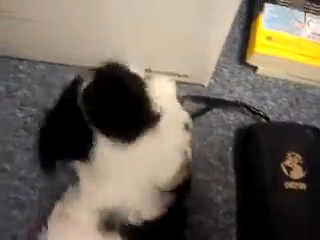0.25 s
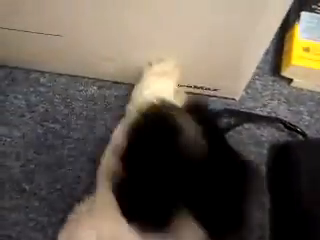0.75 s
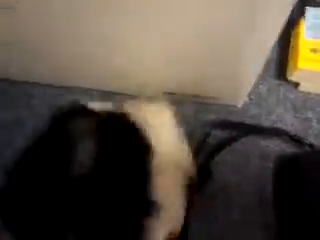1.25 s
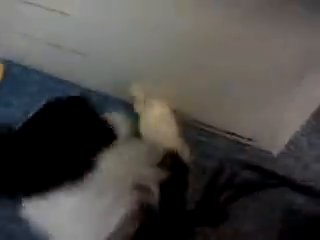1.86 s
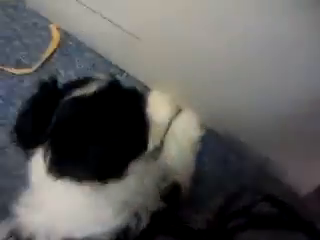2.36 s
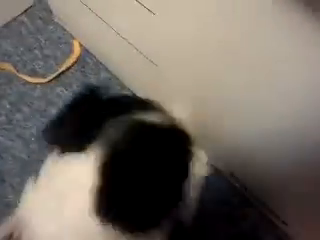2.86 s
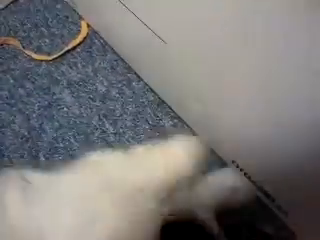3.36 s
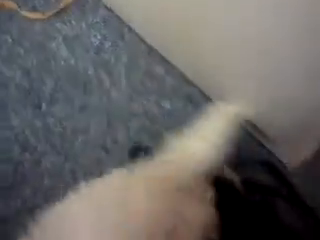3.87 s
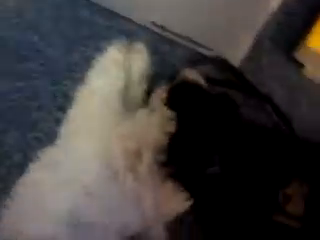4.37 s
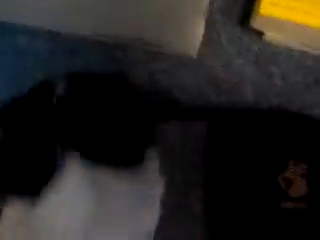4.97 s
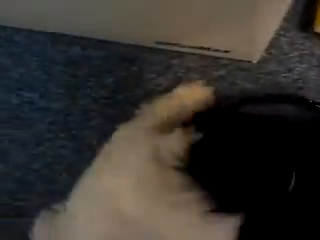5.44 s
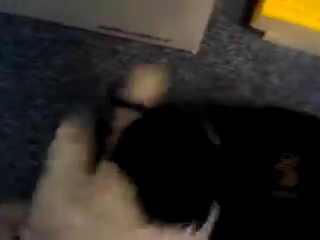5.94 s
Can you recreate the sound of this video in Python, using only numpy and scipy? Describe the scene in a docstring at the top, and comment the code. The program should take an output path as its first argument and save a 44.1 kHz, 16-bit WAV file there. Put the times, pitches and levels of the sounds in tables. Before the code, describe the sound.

Close up in a small carpeted room, a little dog digs at a cardboard box. Paws slap the hollow panel about five times a second, each slap followed by a dry rising rasp of claws and sometimes a soft thump. It stops; the box ticks and creaks. A shorter flurry follows, then a faint wheeze, light rustling and quiet room hum. The phone microphone sounds slightly dull on top.

```python
"""A puppy digs at a cardboard box on a carpet: each paw slaps the panel, exciting its resonant modes,
then the claws rake down the card in stick-slip, with short ticks and soft thumps as the box rocks.
The box creaks in runs of even slips, fur rubs as filtered jolts, and a faint wheeze flutters as a tone.
A small room answers with decaying noise and hums as shaped noise; a phone microphone dulls the treble."""
import sys
import numpy as np
from scipy import signal
from scipy.fft import rfft, irfft, next_fast_len
from scipy.io import wavfile
from scipy.ndimage import map_coordinates

SR = 44100
rng = np.random.default_rng(int(sys.argv[2]) if len(sys.argv) > 2 else 0)


def magnitude_from_level(level_db):
    """Linear magnitude for a level in decibels (20 dB per decade)."""
    exponent = np.asarray(level_db, float) / 20
    return 10 ** exponent


def output_pcm(signal):
    """Save a mono or channel-first signal as 16-bit PCM at the path in sys.argv[1].

    Samples are clipped to [-1, 1] before scaling.
    """
    pcm = np.clip(np.atleast_2d(signal).T, -1, 1) * 32767
    wavfile.write(sys.argv[1], SR, np.round(pcm).astype(np.int16))


N = 273787
TIME = np.arange(N) / SR  # seconds

# Paw landings. Each row: start in seconds, then levels in dB, before trims common to all rows,
# of the peak, the low panel modes, the high panel modes and the claw skid.
SLAPS = [(0.004, -18, -13.5, -13, -34.5), (0.236, -17.5, -4, -11.5, -31), (0.434, -20, -11.5, -13, -38.5),
         (0.602, -14.5, -33, -25, -58), (0.642, -28.5, -3, -27, -41.5), (0.81, -21.5, -16.5, -15.5, -40),
         (0.842, -26.5, -10.5, -20, -60), (1.039, -19, -6.5, -4, -32), (1.259, -19.5, -9.5, -12.5, -41),
         (1.283, -30, -14, -26, -69), (1.478, -12, -15, -12.5, -25.5), (1.71, -13, -6, -8.5, -31.5),
         (1.948, -19, -16, -5.5, -41), (2.1, -31.5, -2, 6, -33), (2.171, -19.5, -27, -11.5, -33),
         (3.027, -22, -9.5, -4, -27), (3.254, -18, -11, -11.5, -24), (3.478, -33.5, -19, -6, -43),
         (3.619, -12.5, -2, 4, -29), (3.734, -21, -26, -15, -44), (3.811, -21, -24, -10, -28.5),
         (3.872, -41, -24, -9, -47.5), (3.956, -32.5, -41, -11, -30.5)]
# Modes of the box panel. Each row: frequency in Hz, width in Hz, level in dB.
PANEL = [(82, 34, -11.5), (247, 97, -2), (400.5, 102, 0.5), (699, 217, 0.5), (985, 210, -0.5),
         (1323, 284, -2.5), (1866, 323, -5.5), (2920, 490, -12), (6080, 640, -18.5)]
# Resonances of a claw on card fibres. Each row: frequency in Hz, width in Hz, level in dB.
FIBRES = [(1390, 660, -16), (3270, 960, -3), (4440, 1700, -5.5), (5580, 1120, -1.5), (6930, 1130, -1),
          (7313, 1520, -7)]


def unit(x):
    """Normalisation to a root-mean-square of 1."""
    return x / np.sqrt(np.mean(x ** 2) + 1e-20)


def along(points, hz):
    """Interpolation of (Hz, value) points on a logarithmic frequency axis."""
    f, v = np.transpose(points)
    return np.interp(np.log(hz + 1), np.log(f + 1), v)


def curves(rows):
    """Linear interpolation in time: one value per sample for each column after the time."""
    s, *cols = np.transpose(rows)
    return [np.interp(TIME, s, c) for c in cols]


def wobble(rate):
    """Smooth random modulation: a spline through random knots, rate of them a second (400 at most)."""
    knots = rng.standard_normal(int(N / SR * 400) + 4)
    return map_coordinates(knots, [TIME * min(rate, 400)])


def filtered(x, response):
    """Linear filtering: the spectrum of x times a response given over frequency."""
    m = next_fast_len(len(x) + 8192)
    return irfft(rfft(x, m) * response(np.fft.rfftfreq(m, 1 / SR)), m)[:len(x)]


def ringing(modes):
    """Modal superposition: causal second-order resonances summed with alternating sign."""
    def response(f):
        total = 0
        for k, (centre, width, db) in enumerate(modes):
            damping = 1j * f * width
            total = total + (-1) ** k * magnitude_from_level(db) * damping / (centre * centre - f * f + damping)
        return total
    return response


def catches(share, spread_db):
    """Stick-slip force: a share of samples carry a jolt of widely varying size."""
    jolt = rng.standard_normal(N) * magnitude_from_level(spread_db * rng.exponential(size=N))
    return unit(jolt * (rng.random(N) < share))


def gritty(modes, share, spread_db, flicker_db):
    """Stick-slip excitation of modes whose strengths flicker as the contact point moves."""
    force = catches(share, spread_db)
    total = np.zeros(N)
    for k, mode in enumerate(modes):
        strength = magnitude_from_level(flicker_db * wobble(70))
        total += (-1) ** k * strength * filtered(force, ringing([mode]))
    return unit(total)


def add(track, s, sound):
    """Superposition: mixes a sound into the track at time s."""
    room = track[round(s * SR):][:len(sound)]
    room += sound[:len(room)]


def damped_click(track, s, db, hz):
    """Free decay: a damped sine rings on a dull burst of resonant noise."""
    t = TIME[:1024]
    ring = np.sin(2 * np.pi * hz * t) * magnitude_from_level(-60 * t * hz / 16)  # falls 60 dB in sixteen cycles
    burst = 1.12 * rng.standard_normal(len(t)) * magnitude_from_level(-60 * t / 0.053)
    click = filtered(burst, ringing([(2500, 2400, 0)]))
    add(track, s, magnitude_from_level(db - 9.0) * (ring + click))


def room_tone():
    """Stationary noise: a fixed spectral shape gives hum and hiss, its level drifting slightly."""
    # Spectrum of the quiet room. Each row: frequency in Hz, relative density in dB per Hz.
    tone_spectrum = [(15, -57.5), (25, -31), (80, -23.5), (107, -10), (176, 1.5), (214, -7.5), (268, -8),
                     (369, -11), (428, -9), (1590, -21.5), (2030, -19.5), (2940, -25), (6640, -25.5),
                     (8100, -23.5), (9160, -47), (11900, -96), (20200, -120)]
    hum = filtered(rng.standard_normal(N), lambda f: magnitude_from_level(along(tone_spectrum, f)))
    return magnitude_from_level(-56 + 0.63 * wobble(6.4)) * unit(hum)


def drag():
    """Sliding friction: clumpy rubbing, bright on carpet, dull on panel; the dog's weight thuds under it."""
    # Fur and pads dragging. Each row: time in seconds, level on the carpet in dB,
    # level on the panel in dB, both before a fixed trim.
    drag_levels = [(0.0, -56.5, -50.5), (0.34, -58.5, -62.5), (0.5, -49.5, -46.5), (0.71, -54.5, -49),
                   (0.86, -60, -63), (1.14, -55, -49), (1.3, -58, -51), (1.64, -52.5, -51.5),
                   (2.16, -54, -45), (2.4, -58, -55), (2.66, -56.5, -51), (2.85, -61.5, -58.5),
                   (3.45, -54, -54), (3.6, -63, -64), (4.0, -59, -63), (4.25, -54.5, -51.5),
                   (4.44, -62, -61), (5.6, -66, -61), (6.2, -57.5, -58)]
    rustle_db, panel_db = curves(drag_levels)
    weight_db = -74 + 0.9 * (panel_db + 56)  # follows the rubbing on the panel
    rustle = unit(filtered(catches(share=.3, spread_db=2.0), ringing(FIBRES)))
    panel = unit(filtered(catches(share=0.05, spread_db=2.0), ringing(PANEL[1:7])))
    thuds = unit(filtered(rng.standard_normal(N), ringing(PANEL[:1])))
    rustle = magnitude_from_level(rustle_db - 3.5 + 1.7 * wobble(31)) * rustle
    panel = magnitude_from_level(panel_db - 6.5 + 2.4 * wobble(30)) * panel
    return rustle + panel + magnitude_from_level(weight_db + 4.3 * wobble(14)) * thuds


def slaps():
    """Impact excitation: pad and four claws strike in quick turn, stirring modes by spot; the claws skid."""
    out, skid, t = np.zeros(N), np.zeros(N), TIME[:4096]
    for s, db, low_db, high_db, skid_db in SLAPS:
        luck = rng.random((3, len(PANEL)))
        # seconds over which the claws land: a hard blow lands them closer together
        spread = np.clip(.008 - .0012 * (db + 12), .004, .017)
        force = np.zeros(len(t))
        when = np.r_[0, luck[0, :4] * spread]
        claws = (.85 - .65 * luck[0, :4]) * np.sign(luck[0, 4:8] - .3)  # later claws land softer
        force[(when * SR).astype(int)] = np.r_[1, claws]
        force += 0.13 * rng.standard_normal(len(t)) * magnitude_from_level(-60 * t / (3.08 * spread))  # the pad rolls flat
        # mode gain at the landing spot: (Hz, dB)
        spot = [(80, -11.0), (300, low_db + 9.5), (400, low_db + 11), (850, -0.5), (1600, high_db + 8)]
        modes = []
        for (hz, width, level), a, b in zip(PANEL, luck[1], luck[2]):
            modes.append((hz * (0.931 + 0.095 * a), width, level + along(spot, hz) + 4 * b))
        knock = filtered(force, ringing(modes))
        add(out, s, magnitude_from_level(db + 0.5) * knock / abs(knock).max())
        # the skid falls 20 dB in 5 ms once the claws are down
        add(skid, s, magnitude_from_level(skid_db - 6.5 - 20 * np.maximum(t - spread, 0) / 0.005))
    return out + skid * gritty(FIBRES, share=.25, spread_db=2.1, flicker_db=1.5)


def walls(x):
    """Reverberation: noise tails, redrawn every tenth of a second, decay at a rate set by frequency."""
    # Decay of the room. Each row: frequency in Hz, time to fall 60 dB in seconds.
    decay_times = [(200, .25), (1000, .2), (7000, 0.14)]
    out, step = np.zeros(N), SR // 10
    for start in range(0, N, step):
        hz, t, z = signal.stft(rng.standard_normal(SR // 4), SR, nperseg=256)
        decay = magnitude_from_level(-60 * t / along(decay_times, hz)[:, None])
        tail = signal.istft(z * decay, SR, nperseg=256)[1]
        answer = signal.fftconvolve(x[start:start + step], tail / np.linalg.norm(tail))
        add(out, start / SR + .004, answer)
    return out


def strokes():
    """Stick-slip friction: claws speed up down the card, hold, let go; panel rumble leads the rasp."""
    # Claw strokes. Each row: release in seconds, rasp level in dB, panel rumble level in dB,
    # rasp rise time per 20 dB in ms, hold before release in ms (both times kept within 1 to 90).
    stroke_rows = [(0.109, -24, -36.5, 22.5, 0.88), (0.335, -29.5, -37, 16.5, 25.3),
                   (0.557, -31.5, -36, 25, 21.6), (0.659, -42.5, -54, 7, 10),
                   (0.709, -27.5, -36.2, 23.5, 3.5), (0.751, -53.5, -51, 34, 12),
                   (0.936, -32, -35, 14.5, 20), (1.17, -28.5, -34, 34, 34), (1.386, -31, -33.5, 7.5, 18.4),
                   (1.589, -26, -34.5, 20.5, 17), (1.81, -21, -31.5, 24.5, 0.87),
                   (1.967, -37.5, -37, 28, 7), (2.043, -28, -34.5, 9.5, 17.5), (2.29, -34, -41.5, 26.5, 15),
                   (2.361, -45, -47, 39, 1.1), (3.127, -22.5, -37.5, 27.5, 0.81),
                   (3.381, -22.5, -32.5, 35.5, 4.7), (3.561, -35, -50.5, 37, 4.3),
                   (3.588, -34, -47, 27, 5.3), (3.74, -37, -40, 28, 6.5), (3.838, -28.5, -38.5, 62, 6.9),
                   (4.0, -43.5, -60, 80, 27), (4.027, -31.5, -42.5, 26, 1), (4.776, -52.5, -58, 11, 26),
                   (5.915, -56.5, -62, 28, 9.4)]
    # Treble of the rasp. Each row: time in seconds, gain in dB well above the knee.
    treble_gain = [(0, 0.5), (0.7, 0), (1.3, -0.5), (1.6, 1.8), (2.04, 3.5), (2.4, -4.5), (3.1, 2.5),
                   (3.6, -1.5), (4.1, 1.5), (6.2, 3)]
    treble_knee_hz, landing_lead_s, let_go_ms = 5070, .012, 9  # let go: ms to fall 20 dB
    rasp, rumble = np.zeros((2, N))
    landings = np.array([row[0] for row in SLAPS])
    for s, db, rumble_db, *ms in stroke_rows:
        rise, hold, fall = np.clip([*ms, let_go_ms], 1, 90) / 1000
        before, after = np.maximum(s - hold - TIME, 0), np.maximum(TIME - s, 0)
        # nothing rasps before the paw is on the box
        down = TIME > landings[landings < s - landing_lead_s].max()
        snap_db = 4 * np.exp(-((TIME - s + 0.0057) / 0.0016) ** 2)  # the tips spring free
        rasp += down * magnitude_from_level(db + snap_db - 20 * before / rise - 20 * after / fall)
        rasp += (TIME > s) * magnitude_from_level(db - 31.5 - 20 * after / 0.1)  # the pads slide off onto the carpet
        rumble += down * magnitude_from_level(rumble_db - 20 * before / (2.41 * rise) - 20 * after / (1.4 * fall))
    ribs = magnitude_from_level(1.36 * wobble(220))  # the corrugation makes the grip uneven
    fibres = unit(ribs * gritty(FIBRES, share=.25, spread_db=1.1, flicker_db=2.5))
    panel = unit(ribs * gritty(PANEL[1:7], share=.05, spread_db=1.5, flicker_db=2.0))
    treble = filtered(fibres, lambda f: 1 / (1 + (treble_knee_hz / (f + 1)) ** 8))
    fibres = fibres + (magnitude_from_level(curves(treble_gain)[0]) - 1) * treble
    return rasp * fibres + rumble * panel


def thumps():
    """Impulsive loading: each rock of the box under a hard pull is one soft push on a low, broad mode."""
    # Rocks of the box on the carpet. Each row: time in seconds, level of the push in dB.
    rocks = [(.108, -51), (.33, -41.5), (.556, -45), (0.705, -50), (1.165, -38), (1.379, -56), (1.586, -38),
             (1.807, -38.5), (2.041, -38), (2.104, -35.5), (2.298, -54), (3.125, -43), (3.38, -43)]
    push = sum(magnitude_from_level(db) * np.exp(-((TIME - s) / 0.0019) ** 2) for s, db in rocks)
    return filtered(push, ringing([(45, 210, 0.015)]))


def ticks():
    """Free vibration: claw tips, and the louder slips of the creaking box, each ring at their own pitch."""
    # Short clicks: claw tips, and the louder slips of the creaking box.
    # Each row: start in seconds, level in dB before a fixed trim, pitch in Hz.
    tick_rows = [(0.191, -35, 1580), (0.396, -28.5, 2220), (0.496, -38, 929), (0.954, -32, 3530),
                 (0.998, -33.5, 2800), (2.138, -25.5, 2750), (2.439, -30, 1610), (2.7, -28, 1270),
                 (2.931, -29, 3280), (3.419, -20.5, 2160), (4.764, -33, 1450), (5.278, -37, 1000),
                 (5.82, -42, 1890), (5.865, -39, 1900), (5.955, -41.5, 825), (6.003, -42, 1660)]
    out = np.zeros(N)
    for s, db, hz in tick_rows:
        damped_click(out, s, db, hz)
    return out


def creaks():
    """Periodic stick-slip: the settling box gives way in runs of evenly spaced slips."""
    # Runs of slips. Each row: first slip in seconds, spacing in seconds, number of slips,
    # mean level in dB before a fixed trim.
    creak_runs = [(2.4655, .0285, 8, -37), (2.743, .0445, 3, -36.5)]
    out = np.zeros(N)
    for s, gap, count, db in creak_runs:
        for k in range(count):
            slip_db = db + 4.5 * rng.standard_normal()
            slip_hz = 900 * (1 + 0.026 * rng.standard_normal())
            damped_click(out, s + k * gap, slip_db, slip_hz)
    return out


def wheeze():
    """Amplitude modulation: random flutter blurs a gliding sine that fades in and out."""
    # A faint narrow wheeze. Each row: time in seconds, frequency in Hz, level in dB.
    wheeze_line = [(3.84, 1150, -52), (4.08, 1160, -62), (4.2, 1200, -60), (4.33, 1160, -59),
                   (4.44, 1206, -67), (4.48, 1090, -64), (4.55, 1060, -69), (4.6, 1060, -75)]
    hz, db = curves(wheeze_line)
    from_ends = np.minimum(TIME - wheeze_line[0][0], wheeze_line[-1][0] - TIME)
    sounding = np.clip(from_ends / 0.036, 0, 1)  # 36 ms fades
    flutter = unit(wobble(160)) * magnitude_from_level(1.5 * wobble(30))
    tone = np.sqrt(2) * np.sin(2 * np.pi * np.cumsum(hz) / SR)
    return sounding * magnitude_from_level(db) * flutter * tone


def scene():
    """Superposition of direct sound and reverberation: the dog at the box, in the room."""
    near = slaps() + strokes() + thumps() + ticks() + creaks() + drag()
    return (near + magnitude_from_level(-14.5) * walls(near) + wheeze() + room_tone())[None]


def low_pass(x):
    """Removes everything above the highest recorded frequency."""
    return signal.sosfilt(signal.butter(12, 9310, fs=SR, output="sos"), x)


def record(dry):
    """Low-pass filtering: the phone rolls off steeply above 8 kHz."""
    rolloff = [(7600, 0.5), (8500, -8.0), (9000, -21.0), (9350, -51.0)]  # (Hz, dB)
    band = filtered(dry[0], lambda f: magnitude_from_level(along(rolloff, f)))
    return low_pass(band[None])


dry = scene()
out = record(dry)
output_pcm(out)
```